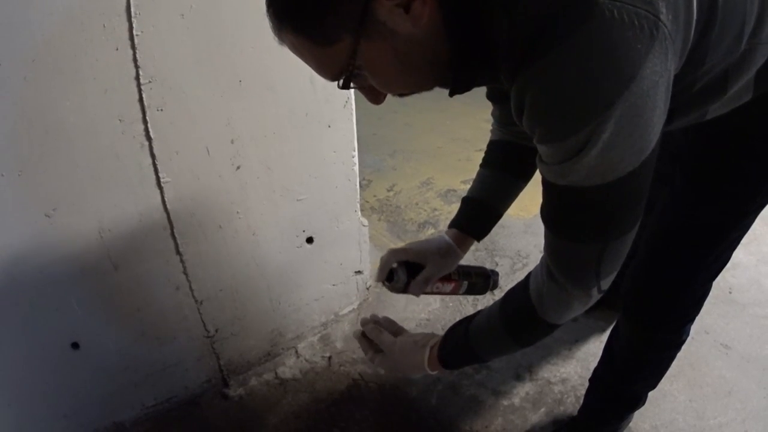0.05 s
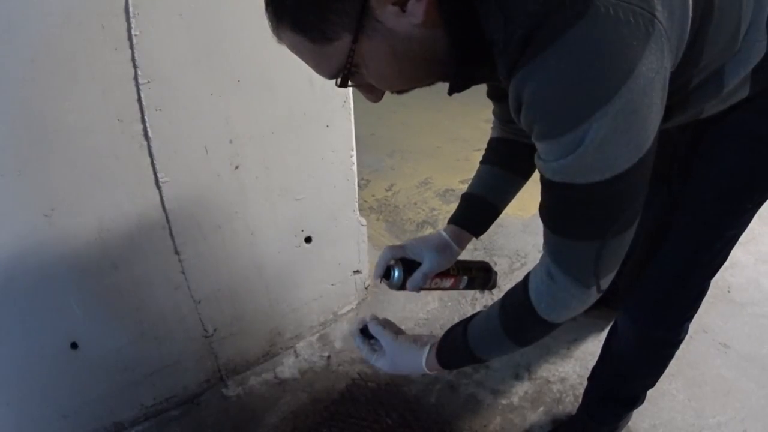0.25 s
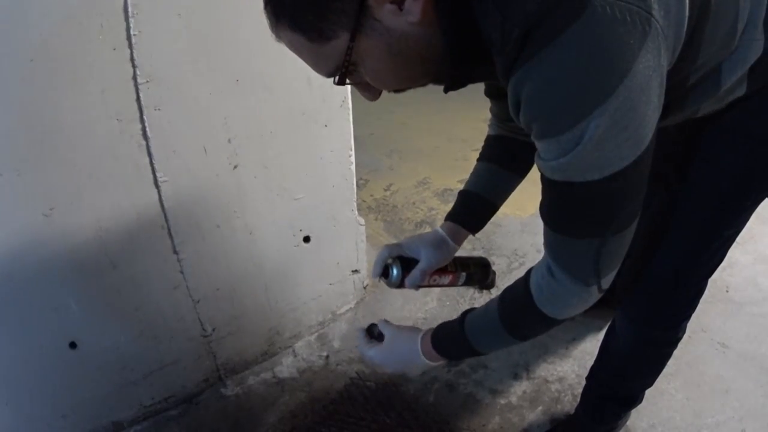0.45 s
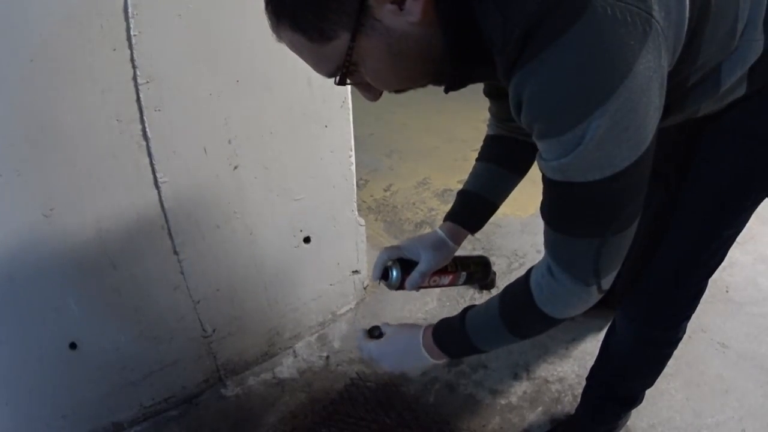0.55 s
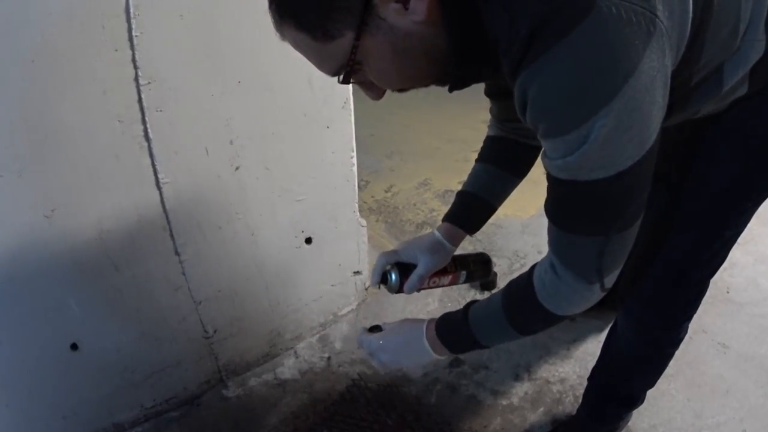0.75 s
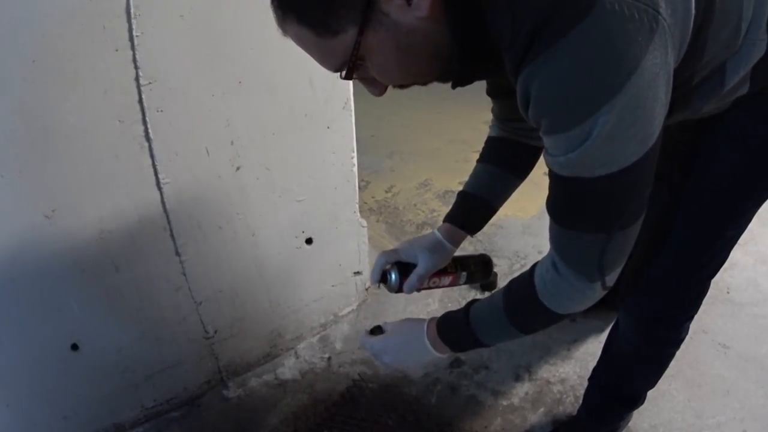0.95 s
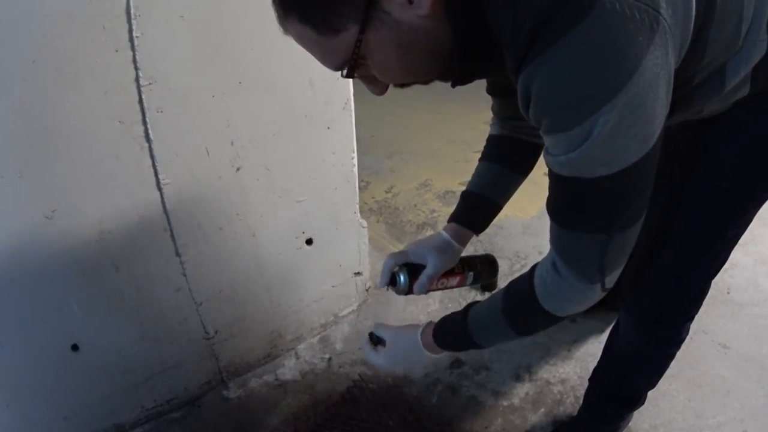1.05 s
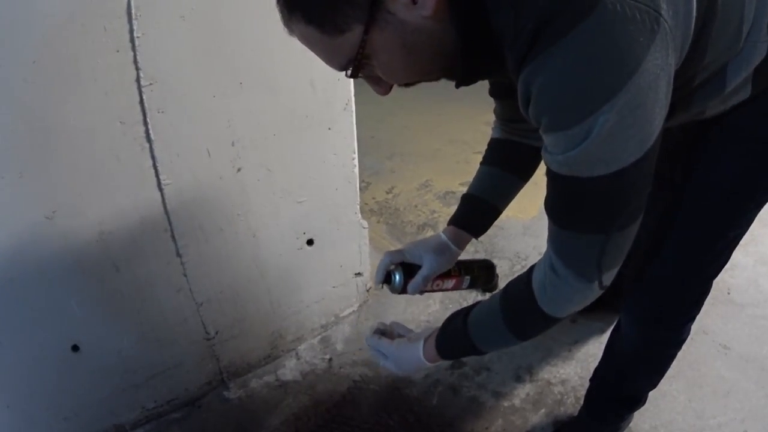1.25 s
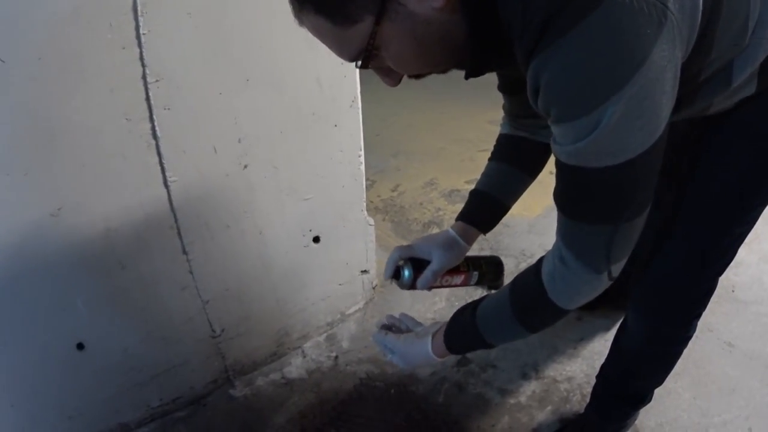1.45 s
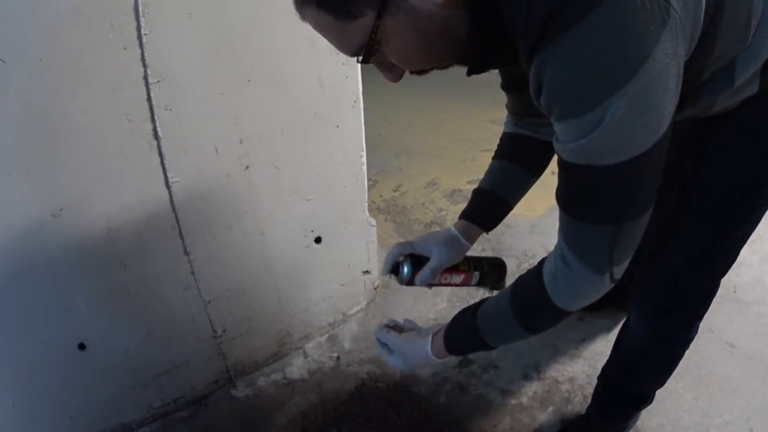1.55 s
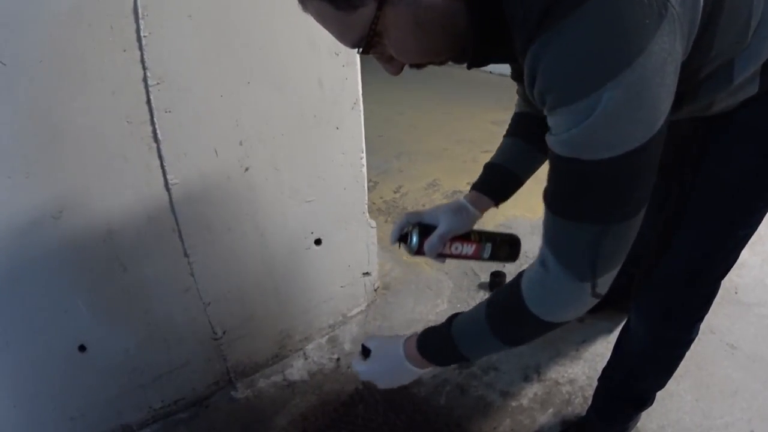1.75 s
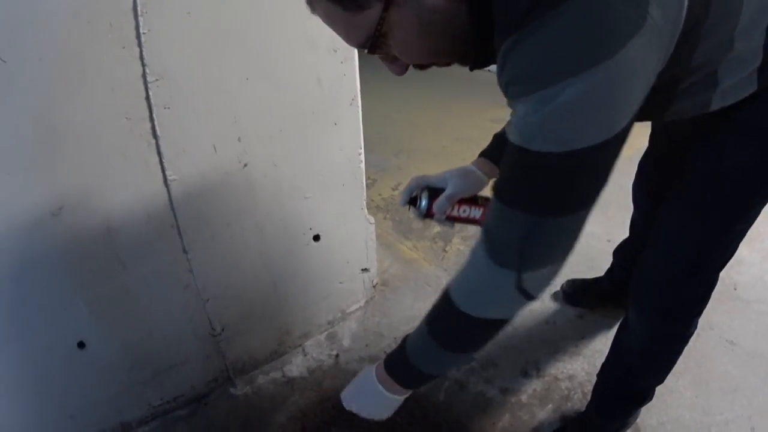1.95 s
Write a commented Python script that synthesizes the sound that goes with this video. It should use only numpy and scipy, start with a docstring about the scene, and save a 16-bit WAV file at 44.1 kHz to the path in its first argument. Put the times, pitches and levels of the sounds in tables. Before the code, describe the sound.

An aerosol can hisses close by, already spraying at the start, flaring slightly as the jet crosses a small part; it stops sharply, leaving a short garage echo and tiny drip ticks, picked up by close stereo microphones.

```python
"""A close, breathy hiss: an aerosol can sprays a small hand-held part in a concrete garage, then the valve is let go.
The jet is noise coloured by part, hand and nearby wall; noise swells flare where it crosses an edge or hollow.
A nozzle whistle, narrow noise on a wandering pitch, runs through it; drops tick off the part as short rings.
The garage rings on in decaying bands of noise over its quiet, steady background, heard by two close microphones."""
import sys
import numpy as np
from scipy import signal
from scipy.fft import rfft, irfft
from scipy.io import wavfile
from scipy.ndimage import map_coordinates

SR = 44100
rng = np.random.default_rng(int(sys.argv[2]) if len(sys.argv) > 2 else 0)


def to_wav(sig):
    """Store sig (one row per channel, or 1-D mono) as 16-bit WAV at the path in sys.argv[1].

    Samples outside -1..1 are clipped; the rate is SR.
    """
    pcm = np.clip(np.atleast_2d(sig), -1, 1) * 32767
    pcm = np.round(pcm).astype(np.int16)
    wavfile.write(sys.argv[1], SR, pcm.T)  # frames by channels


def level_to_linear(level):
    """Convert decibel levels to linear amplitude factors, elementwise."""
    exponent = np.asarray(level, float) / 20
    return 10 ** exponent


N = 88200
LEAD = SR   # samples of spraying before time zero, to fill the room
T = (np.arange(N + LEAD) - LEAD) / SR   # seconds
SPUTTER_DB = 1   # fast roughness shared by jet and flares


def rms_one(x):
    """Scale to rms 1."""
    return x / np.sqrt(np.mean(x ** 2) + 1e-20)


def at_hz(points, hz):
    """Read a table on a log-frequency axis."""
    p = np.array(points)
    return np.interp(np.log(np.maximum(hz, 1)), np.log(p[:, 0]), p[:, 1])


def shaped(x, gain_of_hz):
    """Filter by a gain given as a function of frequency."""
    hz = np.fft.rfftfreq(x.shape[-1], 1 / SR)
    return irfft(rfft(x) * gain_of_hz(hz), x.shape[-1])


def bump(hz, centre_hz, octaves):
    """Bell-shaped gain on a log-frequency axis, 1/e at half the width either side."""
    return np.exp(-4 * (np.log2(np.maximum(hz, 1) / centre_hz) / octaves) ** 2)


def drift(rate_hz):
    """Random wander of spread 1: noise through two equal low-passes, made at every 40th sample."""
    r = np.exp(-2 * np.pi * rate_hz * 40 / SR)
    white = rng.standard_normal(len(T) // 40 + 2002)
    slow = signal.lfilter([1], [1, -2 * r, r * r], white)[2000:]   # drop the settling
    return np.interp(np.arange(len(T)) / 40, np.arange(len(slow)), rms_one(slow - slow.mean()))


def jet_colour(hz):
    """Broad spectrum of the jet with the resonances of its surroundings on top."""
    # turbulent hiss: frequency_hz, density_db (relative, per Hz)
    broad = [(71, -60), (120, -35), (326, -29), (368, -14.5), (904, -13.5), (1500, -6.5), (2130, -3.5),
             (2510, -6.5), (5780, -6), (11100, -11), (15700, -18)]
    # resonances of part, hand and close reflections: centre_hz, width_hz, boost_db
    hollows = [(380, 95, -1), (597, 118, 4.5), (924, 136, 7), (1270, 110, 2.5), (1724, 67, 4),
               (2090, 580, 1.5), (2390, 74, 1), (2714, 150, 5.5), (3130, 180, 2.5), (3360, 140, 2),
               (3945, 78, 5), (4440, 110, 1.5), (4750, 96, 1.5), (7700, 450, 1.5), (8700, 900, -1.5),
               (11000, 940, 4)]
    boost = sum(db / (1 + (2 * (hz - f) / w) ** 2) for f, w, db in hollows)
    return level_to_linear(at_hz(broad, hz) + boost)


def jet():
    """Turbulent noise; each third-octave wanders on its own, all flutter and sputter together."""
    # strength of the jet: time_s, level_db
    flow = [(0.0, -40), (0.05, -44), (0.27, -43), (0.278, -44), (0.396, -43.5), (0.422, -42),
            (0.466, -43.5), (1.5, -44)]
    # hiss below about 1.1 kHz: time_s, change_db
    bass_points = [(0, 3.5), (.1, 0), (.3, -1), (.4, 1), (.6, -2.5), (.7, 0.5), (1.05, 0.5), (1.25, -1.5),
                   (1.32, 2.5), (1.44, -4), (1.53, -0.5)]
    # hiss at about 2.2-4.5 kHz: time_s, change_db
    presence_points = [(0, -2), (.15, -1), (.35, -0.5), (.5, -1.5), (.65, 0), (.8, 0), (1.0, -0.5),
                       (1.15, 1), (1.35, 0), (1.5, 0)]
    # hiss at about 4.5-9 kHz: time_s, change_db
    middle_points = [(0, -0.5), (.2, 1.5), (.45, 1), (.6, 0), (.85, 0.5), (1.0, -0.5), (1.2, 1.5), (1.4, 2),
                     (1.5, 3.5)]
    # hiss above about 9 kHz: time_s, change_db
    treble_points = [(0, 1), (.1, -0.5), (.3, 0.5), (.45, 1), (.58, -2), (.75, 0), (.95, -1.5), (1.101, -2),
                     (1.2, -1.5), (1.35, 0.5), (1.45, -2), (1.55, 1)]
    patch_db, flutter_db = 0.23 * 0 + 1.48, 0.23

    regions = (bass_points, presence_points, middle_points, treble_points)
    bass, presence, middle, treble = [np.interp(T, *np.transpose(points)) for points in regions]
    hz = np.fft.rfftfreq(len(T), 1 / SR)
    spectrum = rfft(rng.standard_normal(len(T))) * jet_colour(hz)
    place = 3 * np.log2(np.maximum(hz, 250) / 250)   # third-octaves above 250 Hz
    out = 0
    for k in range(19):
        band = irfft(spectrum * np.cos(np.pi / 2 * np.clip(place - k, -1, 1)) ** 2, len(T))
        if k > 15:
            change = treble
        elif k > 12:
            change = middle
        elif k > 9:
            change = presence
        elif k < 7:
            change = bass
        else:
            change = 0
        out = out + band * level_to_linear(patch_db * drift(5.0) + change)
    level = np.interp(T, *np.transpose(flow))
    return rms_one(out) * level_to_linear(level + flutter_db * drift(19.0) + SPUTTER_DB * drift(130.0))


def flares(rows):
    """Brief swells of rough noise in one region of the spectrum, over a faint broad treble skirt."""
    skirt_db, skirt_from_hz = -22.5, 3100
    out = 0
    for s, length, db, hz, octaves in rows:
        def colour(f):
            return bump(f, hz, octaves) + level_to_linear(skirt_db) / (1 + (skirt_from_hz / (f + 1)) ** 4)
        noise = rms_one(shaped(rng.standard_normal(len(T)), colour))
        out = out + noise * level_to_linear(db) * np.exp(-4 * ((T - s) / length) ** 2)
    return out * level_to_linear(SPUTTER_DB * drift(160.0))


def whistle():
    """Breathy nozzle whistle: narrow noise carried on a wandering pitch."""
    # path of the whistle: time_s, level_db, pitch_hz
    path = [(0, -50, 2090), (.12, -61, 2082), (.22, -54.5, 2110), (.3, -57.5, 2146), (.37, -52, 2112),
            (0.451, -59, 2103), (.6, -67, 2150), (.75, -53, 2208), (.85, -59, 2150), (1.03, -53, 2260),
            (1.14, -53.5, 2148), (1.25, -56, 2255), (1.35, -49.5, 2194), (1.441, -56, 2145),
            (1.5, -59, 2147)]
    width_hz = 410   # between half-amplitude points
    s, db, hz = np.transpose(path)
    white = rng.standard_normal((2, len(T)))
    a, b = shaped(white, lambda f: 1 / (1 + (2 * f / width_hz) ** 4))
    phase = 2 * np.pi * np.cumsum(np.interp(T, s, hz)) / SR
    return rms_one(a * np.cos(phase) + b * np.sin(phase)) * level_to_linear(np.interp(T, s, db))


def drops():
    """Each drop off the part is a bright noise tick and a very short ring, dying together."""
    # drops: start_s, level_db, pitch_hz, t60_s
    ticks = [(1.573, -53, 7600, .012), (1.8604, -56, 5600, .012), (1.8617, -55, 6070, .014),
             (1.9681, -53, 8300, .007), (1.9697, -54, 7600, .012), (1.9702, -56, 8700, .012)]
    tick_db, rise_s = -22, 0.00026   # noise against ring; onset of the ring
    out, white = 0, np.diff(rng.standard_normal(len(T) + 1))
    for s, db, hz, t60 in ticks:
        age = np.maximum(T - s, 0)
        ring = np.sin(2 * np.pi * hz * age) * (1 - np.exp(-age / rise_s))
        out = out + (T > s) * level_to_linear(db - 60 * age / t60) * (ring + level_to_linear(tick_db) * white)
    return out


def echoes(x):
    """Close reflections; the hands keep moving, so their delays sway slowly."""
    # floor, wall and body close by: delay_ms, level_db
    reflections = [(.9, -19), (1.8, -25), (2.35, -15), (3.3, -17.5)]
    sway_ms = 0.061
    n = np.arange(len(x))
    out = x
    for ms, db in reflections:
        delay = (ms + sway_ms * drift(1.5)) * SR / 1000   # samples
        out = out + level_to_linear(db) * map_coordinates(x, [n - delay], order=3)
    return out


def garage(x):
    """Diffuse reverberation: half-octave bands of noise dying at their own rates, mid and side unrelated."""
    # decay of the garage: frequency_hz, t60_s
    decay = [(200, 4.1), (800, 1.57), (2000, 1.9), (5000, 1.1), (9000, 0.42), (15000, 0.66)]
    # strength of the reverberation: frequency_hz, level_db (against direct)
    strength = [(200, -13.5), (800, -5), (2000, -11), (5000, -11), (9000, -18), (15000, -25)]
    # spread of the reverberation: frequency_hz, side_against_mid_db
    spread = [(60, -25), (200, -10), (400, -11), (1000, -7), (2400, -8.5), (5000, -9.5), (9000, -16),
              (15000, -16)]
    age, tail = np.arange(2 * SR) / SR, 0
    white = rng.standard_normal((2, len(age)))
    for centre in 125 * 2. ** np.arange(0, 7.5, .5):
        def half_octave(f):
            place = 2 * np.log2(np.maximum(f, 125) / centre)
            return np.cos(np.pi / 2 * np.clip(place, -1, 1)) ** 2
        band = shaped(white, half_octave)
        fade = level_to_linear(-60 * age / at_hz(decay, centre)) * (1 - np.exp(-age / 0.013))   # 13 ms build-up
        tail = tail + band * fade * level_to_linear(at_hz(strength, centre)) / np.sqrt(np.sum(fade ** 2))
    mid, side = signal.fftconvolve(x[None], tail, axes=1)[:, :len(T)]
    return mid, shaped(side, lambda f: level_to_linear(at_hz(spread, f)))


def background():
    """Quiet air of the garage: steady coloured noise, mid and side unrelated."""
    # colour of the background: frequency_hz, density_db (relative, per Hz)
    colour = [(12, -62), (20, -24), (123, -19.5), (158, -10), (268, -6), (316, -13.5), (467, -2.5),
              (840, -7), (5590, -16.5), (6610, -21), (8500, -20.5), (15700, -25.5)]
    # spread of the background: frequency_hz, side_against_mid_db
    spread = [(60, -26), (110, -20), (200, -13), (380, -5), (700, -2.5), (1290, 0), (2380, -11),
              (4400, -10), (8120, -7), (15000, -22)]
    noise = shaped(rng.standard_normal((2, len(T))), lambda f: level_to_linear(at_hz(colour, f)))
    mid, side = level_to_linear(-67) * rms_one(noise)
    return mid, shaped(side, lambda f: level_to_linear(at_hz(spread, f)))


def lean(mid):
    """Side signal that sets level and phase between the two microphones at each frequency."""
    # level balance: frequency_hz, left_minus_right_db
    balance = [(60, -2), (110, 3), (200, 0), (380, -0.5), (700, 1), (1290, 0.5), (2380, 1), (4400, 0.0),
               (8120, -1), (15000, 0.5)]
    # phase balance: frequency_hz, left_lead_radians
    lead = [(60, -.05), (150, -.25), (400, -0.34), (1200, -0.38), (2500, -0.36), (5000, -0.16),
            (9000, -0.12), (16000, -0.22)]
    return shaped(mid, lambda f: np.tanh(at_hz(balance, f) * np.log(10) / 40 + .5j * at_hz(lead, f)))


def scene():
    """Spray, close echoes, garage and background, spread over two close microphones."""
    # the jet flares as it crosses an edge, and a short high whistle near 11 kHz sounds as the valve closes:
    # centre_s, length_s, level_db, centre_hz, width_octaves
    flare_rows = [(0.02, 0.026, -48.5, 8000, 0.87), (0.104, 0.12, -47.5, 5100, 0.43),
                  (0.253, 0.092, -46, 5700, 0.72), (0.422, 0.054, -44.5, 6700, 0.64),
                  (0.77, 0.13, -50.5, 4600, 0.16), (0.86, .06, -53.5, 3474, 0.18),
                  (1.12, .2, -55, 3980, 0.043), (1.545, 0.023, -50.5, 11000, .3),
                  (1.087, 0.048, -46.5, 8050, 1.31), (1.147, 0.044, -47, 5830, 1.7),
                  (1.351, 0.033, -44.5, 3960, 1.9), (1.41, 0.091, -53.5, 7700, 0.23),
                  (1.503, .06, -47, 6400, 0.65), (1.506, 0.028, -52, 3020, .6)]
    # a faint scuff: centre_s, length_s, level_db, centre_hz, width_octaves
    scuff_rows = [(1.915, .04, -70, 3200, 1.3)]
    release_s, closing_db_per_s = 1.527, 411   # the valve closes
    whistle_to_room_db = -4

    valve = level_to_linear(-closing_db_per_s * np.maximum(T - release_s, 0))
    hiss = echoes((jet() + flares(flare_rows)) * valve + flares(scuff_rows) + drops())
    tone = echoes(whistle() * valve)
    room_mid, room_side = garage(hiss + level_to_linear(whistle_to_room_db) * tone)
    air_mid, air_side = background()
    mid = hiss + tone + room_mid + air_mid
    side = room_side + air_side + lean(mid)
    return np.array([mid + side, mid - side])[:, LEAD:]


def low_pass(x):
    """Removes everything above the highest recorded frequency."""
    return signal.sosfilt(signal.butter(12, 17040, fs=SR, output="sos"), x)


def record(dry):
    """The two microphone channels lose their top steeply at 15.74 kHz."""
    padded = np.pad(dry, ((0, 0), (0, 2000)))   # keeps the filter from wrapping end to start
    cut = shaped(padded, lambda f: 1 / (1 + (f / 15740) ** 400))[:, :N]
    return low_pass(cut)


dry = scene()
out = record(dry)
to_wav(out)
```